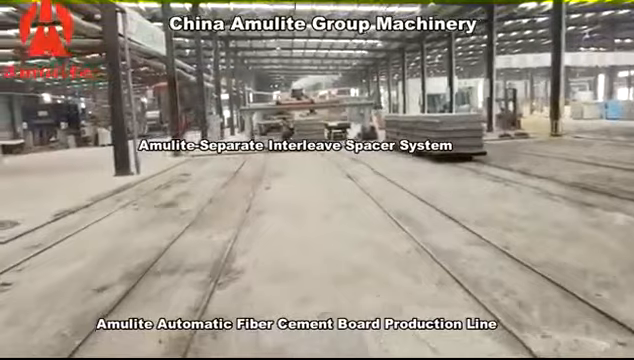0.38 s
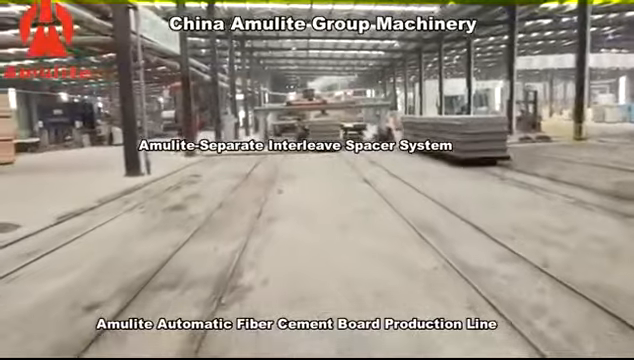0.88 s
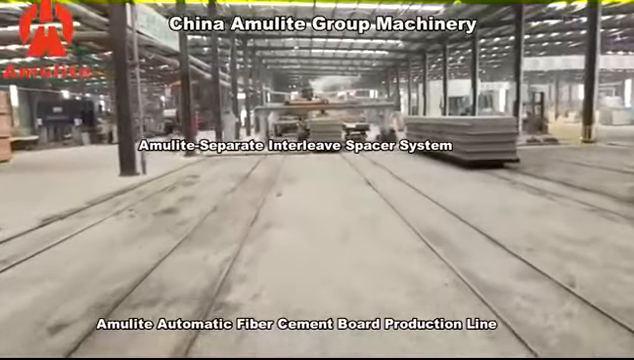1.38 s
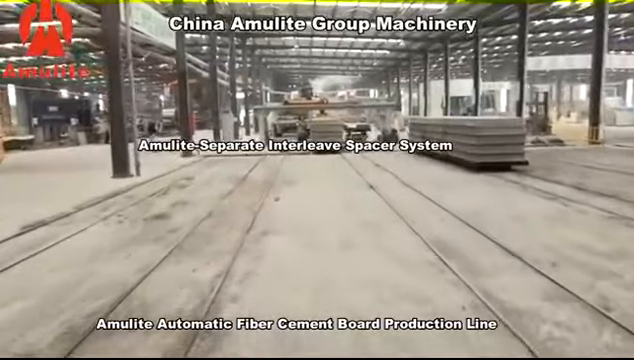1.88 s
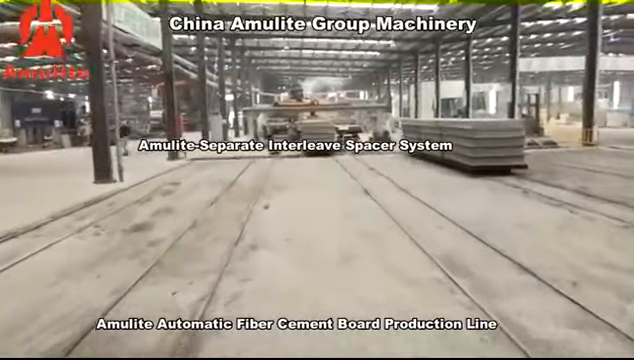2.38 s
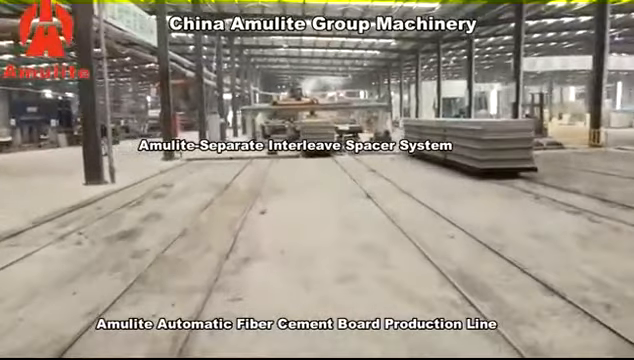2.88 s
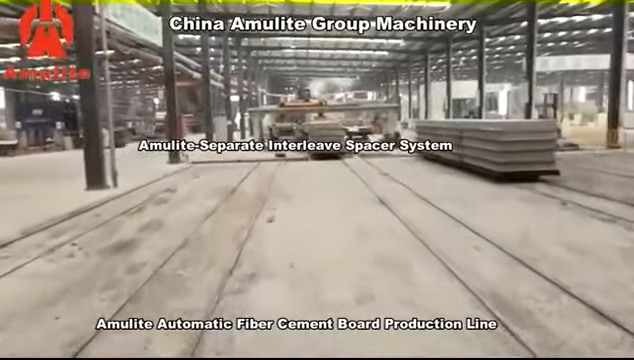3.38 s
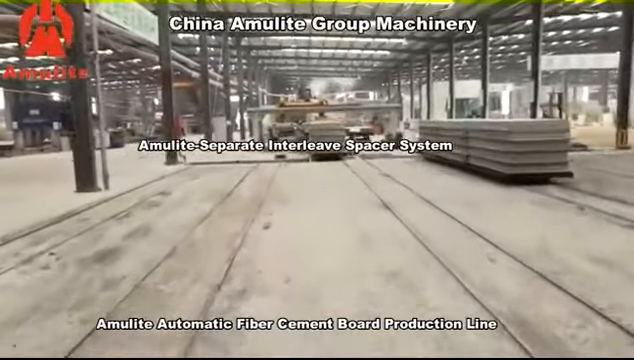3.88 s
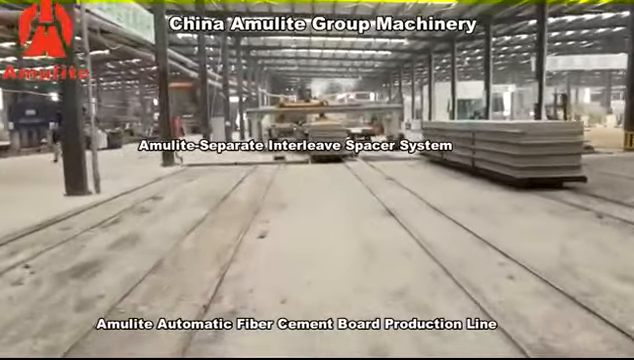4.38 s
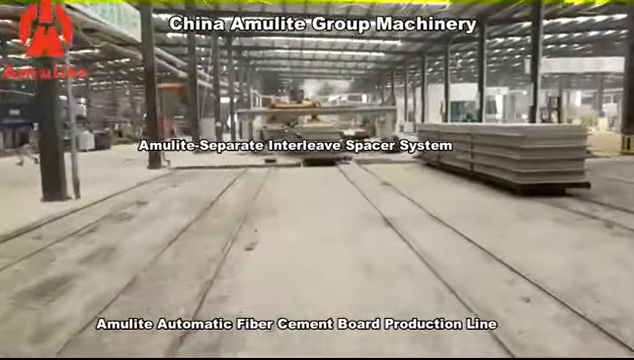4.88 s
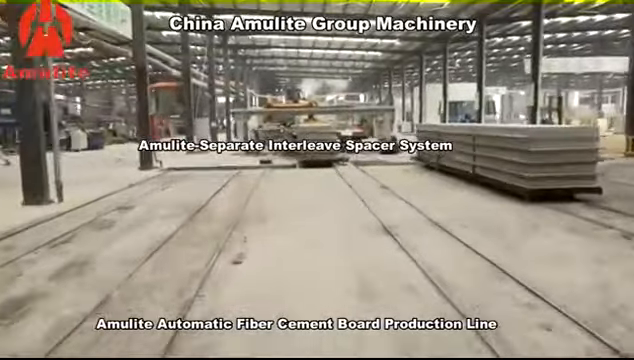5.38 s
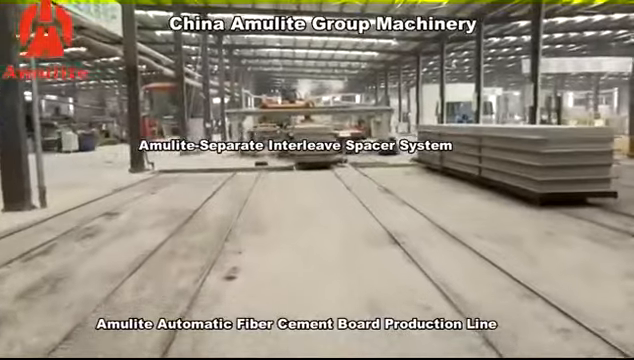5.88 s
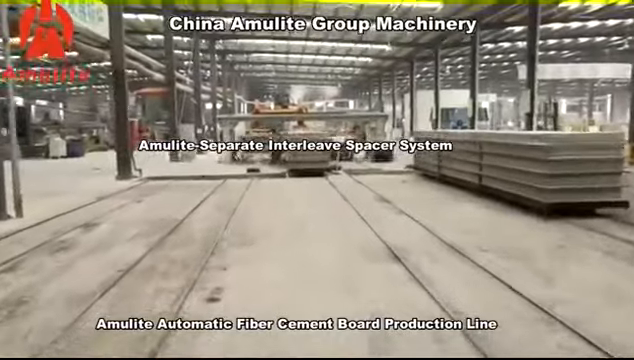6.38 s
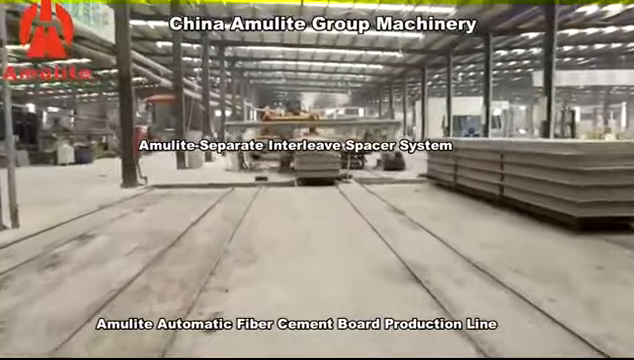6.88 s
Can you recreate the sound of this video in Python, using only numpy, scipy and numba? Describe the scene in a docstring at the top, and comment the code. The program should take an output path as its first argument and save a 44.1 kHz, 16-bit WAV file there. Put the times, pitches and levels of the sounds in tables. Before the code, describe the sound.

Low machinery rumble in a big factory hall, then a sudden loud blast of compressed air, followed by thin high squeals of brakes and rollers.

```python
"""Motors and fans rumble and hum throughout in a large factory hall: shaped noise and wavering tones.
Distant air lines hiss in swells of flickering noise; dry rollers and brakes squeal as fluttering tones.
A valve nearby snaps open and vents compressed air: bright turbulent noise through a ringing nozzle.
The hall is heard from the floor on a phone with one microphone: its gain control ducks everything under
the blast and lets it back slowly; weak treble drops out in patches."""
import sys
import numpy as np
from scipy import signal
from scipy.fft import rfft, irfft
from scipy.io import wavfile
from scipy.ndimage import uniform_filter1d
from numba import njit

SR = 44100
rng = np.random.default_rng(int(sys.argv[2]) if len(sys.argv) > 2 else 0)


def to_linear_factor(level_db):
    """Convert decibel levels (scalar or array-like) to linear amplitude factors."""
    exponent = np.asarray(level_db, float) / 20
    return 10 ** exponent


def wrap_up_sound(samples):
    """Save the sound to the file named by the first command line argument, as 16-bit audio."""
    columns = np.atleast_2d(samples).T
    # keep every value between -1 and 1, then stretch to whole-number steps
    tamed = np.clip(columns, -1, 1)
    steps = np.round(tamed * 32767).astype(np.int16)
    wavfile.write(sys.argv[1], SR, steps)


N = 309512
TIME = np.arange(N) / SR

# Spectrum of the low machine rumble: (frequency [Hz], relative level per Hz [dB])
RUMBLE_SPECTRUM = [(15, -66), (25, -21.5), (43, -27.5), (77, -7), (114, -0.5), (182, 0), (220, -5),
                   (323, -8), (450, -18.5), (700, -63)]
# Load on the machines: (time [s], rumble level before surges and throbs [dB])
MACHINE_LOAD = [(0, -34), (.9, -34), (1.5, -34), (1.9, -34.5), (2.2, -34.5), (2.7, -30.5), (3.42, -31.5),
                (3.9, -34.5), (4.15, -37.5), (4.4, -37.5), (4.65, -37.5), (4.9, -37), (5.6, -38),
                (5.95, -38), (6.25, -37), (6.47, -37.5), (6.7, -35.5), (7.02, -37.5)]
# Throbs of the deep rumble: (loudest moment [s], length [s], lift over the level between throbs [dB])
RUMBLE_THROBS = [(.2, .2, 4), (.56, .1, 3), (.9, .2, 4), (1.85, .25, 4), (2.88, .12, 4), (3.42, .25, 3),
                 (4.35, .4, 5), (5.4, .08, 4), (5.95, .3, 4), (6.46, .15, 6), (6.9, .15, 4)]
BETWEEN_THROBS_DB = -2
SURGE_DB, SURGES_PER_S = .7, 5.5  # random unevenness of the load
# Spectrum of far belts and chains: (frequency [Hz], relative level per Hz [dB])
CLATTER_SPECTRUM = [(250, -29), (380, -10.5), (480, -1), (694, 1.5), (855, -2.5), (1600, -11), (2400, -25)]
CLATTER_DB, CLATTER_FOLLOWS = -45, 0.92  # level at mean load; dB per dB of load
# Motor and gear hum: (pitch [Hz], width [Hz], level before load changes [dB])
HUM_TONES = [(132.1, 9, -50), (196, 26, -48), (328.2, 10, -53), (399, 7.2, -60), (491, 12, -56),
             (592, 8, -57), (704.5, 12, -55), (784, 11, -60.5), (1051, 8, -67)]

# Spectrum of distant air leaks: (frequency [Hz], relative level per Hz [dB])
LEAK_SPECTRUM = [(2500, -27), (3500, -8.5), (4900, -1.5), (5600, 2), (6800, -2), (7880, -7), (8100, -9),
                 (9790, -12.5), (11000, -14.5), (11500, -71)]
# Spectrum of the distant blower: (frequency [Hz], relative level per Hz [dB])
BLOWER_SPECTRUM = [(700, -36), (1200, -9), (1700, -4), (2370, -2.5), (2900, -2.5), (3500, -0.5),
                   (4300, -0.5), (6000, -13)]
# Air demand far off: (time [s], leak level [dB], blower level [dB])
FAR_AIR_FLOW = [(0, -44.5, -48.5), (.38, -40.5, -47.5), (.77, -43.5, -48.5), (1.3, -44, -49),
                (1.4, -40, -46), (1.68, -37.5, -45), (3.7, -39.5, -39.5), (3.9, -39, -42.5),
                (4.09, -41, -44), (4.48, -44, -46.5), (4.92, -40.5, -44), (5.42, -37.5, -42),
                (5.62, -40.5, -42), (5.81, -42.5, -43.5), (6.33, -42, -46.5), (6.58, -40.5, -44.5),
                (6.75, -41.5, -44), (7.02, -39.5, -44.5)]

# Thin wavering whines: (loudest moment [s], length [s], pitch [Hz], width [Hz], top level [dB])
WHINE_EVENTS = [(.05, .1, 10090, 90, -54), (.38, .24, 10050, 110, -53), (.6, .12, 8270, 70, -53),
                (.93, .15, 8270, 40, -48), (1.09, .14, 8262, 40, -48), (1.25, .2, 8255, 70, -55),
                (1.6, .25, 8265, 40, -48), (1.75, .12, 8258, 30, -42), (4.45, 1.1, 703, 25, -52.5),
                (4.35, .6, 790, 30, -53), (3.82, .15, 10080, 110, -60), (4.75, .4, 10080, 120, -60),
                (6.8, .4, 10600, 400, -58)]
WHINE_EDGE_DB = -4.5  # level at both ends of a whine, against its top
# Dry rollers chafing: (loudest moment [s], length [s], top pitch [Hz], width [Hz], top level [dB])
ROLLER_SQUEALS = [(.27, .12, 4310, 200, -43.5), (.36, .05, 5500, 500, -41), (.32, .3, 5120, 600, -44),
                  (.33, .3, 5580, 900, -42), (.62, .33, 5150, 600, -47), (.62, .35, 5600, 900, -44),
                  (1.07, .3, 5600, 900, -46), (5.45, .25, 5280, 120, -46), (6.09, .3, 5075, 110, -34),
                  (6.29, .2, 5050, 170, -40), (6.0, .2, 5040, 120, -38), (6.13, .2, 5185, 130, -39),
                  (6.625, .13, 4940, 130, -40), (6.66, .2, 5060, 90, -42), (6.7, .1, 5230, 120, -42),
                  (6.87, .2, 4980, 300, -46), (6.95, .1, 5380, 120, -39), (6.95, .12, 5190, 150, -40)]
SQUEAL_EDGE_DB, SQUEAL_SAG_HZ = -6.5, 45.54  # level against the top, and drop in pitch, at both ends
# Long brake squeals: (width [Hz], rows of (time [s], pitch [Hz], level [dB]))
BRAKE_SQUEALS = [ (70, [(5.34, 5200, -46), (5.4, 5190, -43), (5.55, 5170, -42), (5.63, 5160, -45)]),
                 (105, [(5.795, 4990, -43), (5.81, 4980, -34), (5.832, 4975, -33), (5.839, 4975, -38),
                 (5.85, 4965, -29), (5.872, 4955, -28), (5.883, 4950, -39), (5.9, 4950, -32),
                 (5.94, 4960, -32), (6.0, 4975, -36), (6.04, 4970, -34), (6.05, 4965, -41),
                 (6.12, 4965, -38), (6.155, 4965, -32), (6.19, 4960, -40), (6.22, 4965, -36.5),
                 (6.28, 4980, -44)]), (150, [(6.605, 5220, -41), (6.62, 5235, -37), (6.66, 5240, -40),
                 (6.68, 5250, -43), (6.695, 5300, -38), (6.712, 5355, -35), (6.735, 5350, -44),
                 (6.76, 5365, -30), (6.79, 5370, -35), (6.81, 5370, -31), (6.84, 5350, -32.5),
                 (6.865, 5320, -35), (6.875, 5290, -42), (6.885, 5270, -33), (6.9, 5250, -41),
                 (6.915, 5250, -35), (6.93, 5270, -36), (6.955, 5290, -30), (6.98, 5330, -33),
                 (6.992, 5260, -42), (7.02, 5260, -45)])]
HALL_T60_S, HALL_DB = .4, -7  # decay time; tail against direct sound

# Spectrum of the air jet: (frequency [Hz], relative level per Hz [dB])
JET_SPECTRUM = [(400, -17.5), (800, -26), (1400, -17.5), (1600, -12), (2030, -8.5), (2390, -12), (2730, -5),
                (3410, -4), (3730, -2), (5150, -2.5), (5680, -0.5), (6610, -3.5), (7800, -8.5),
                (8200, -12.5), (11000, -14.5), (11600, -53)]
# Resonances of the nozzle: (frequency [Hz], width [Hz], boost [dB])
NOZZLE_PEAKS = [(2170, 71, 1.5), (3810, 210, 1.5), (5450, 72, -0.5), (6670, 310, 1.5)]
# Spells of air through the valve: long blast, half-shut trickle, short puff:
# (starts [s], ends [s], jet level before pressure changes [dB],
# extra level at the start, negative where the jet builds up [dB], settling time constant [s])
VALVE_SPELLS = [(1.984, 3.401, -14, -9, 0.09), (3.414, 3.469, -19, -3.5, .1),
                (3.487, 3.547, -17, 13.5, 0.034)]
OPEN_S, SHUT_S = 0.021, 0.024  # time constants of the valve
# The tank pressure wavers and sags: (time [s], change of the jet level [dB])
TANK_PRESSURE = [(2.16, 1.5), (2.22, -1.5), (2.3, 0), (2.35, -2), (2.42, 0), (2.7, -1.5), (2.93, -3),
                 (2.98, -4), (3.2, -5.5), (3.28, -5), (3.4, -5.5)]
GUST_DB, GUSTS_PER_S = 0.5, 14
LINGER_DB, LINGER_S = -8, 0.061  # hiss that hangs in the hall
RING_HZ, RING_WIDTH_HZ, RING_DB, RING_S = 3800, 400, -3, .045  # the nozzle rings out as the valve first opens
RING_ON_DB, RING_ON_S = -11, 1.0  # and rings on faintly while the pressure is high
# Snap of the valve: (time [s], peak level [dB])
VALVE_SNAPS = [(2.0228, -3)]

# Edges of the treble bands in which left and right differ in brief blips: (frequency [Hz])
SPREAD_EDGES = [4600, 5700, 6800, 7500, 8300, 8900, 9700, 10400, 11000]
# Chance of a blip in each of those bands: (share of moments [0 to 1])
SPREAD_SHARES = [.012, .006, .015, .045, .02, .025, .02, .003]
SPREAD_DB = -3  # side level against its band


def walk(rate):
    """Random levels held 1 / rate s and slewed twice; spread near 1."""
    hold = int(SR / rate)
    steps = np.repeat(rng.standard_normal(N // hold + 1), hold)
    return 1.43 * uniform_filter1d(uniform_filter1d(steps, hold), hold)[:N]


def unit(x):
    """Scale to rms 1."""
    return x / np.sqrt(np.mean(x ** 2))


def curve(rows, column, fade_s=0.0075):
    """One column over time, and a gate that falls away outside the table."""
    rows = np.asarray(rows)
    outside = np.maximum(rows[0, 0] - TIME, TIME - rows[-1, 0]).clip(0)
    return np.interp(TIME, rows[:, 0], rows[:, column]), np.exp(-outside / fade_s)


def turbulence(spectrum, flicker_db, rate, peaks=()):
    """Coloured noise in third-octave bands that flicker, each partly with its neighbour."""
    hz = np.maximum(np.fft.rfftfreq(N, 1 / SR), 1)
    points = np.asarray(spectrum)
    db = np.interp(np.log(hz), np.log(points[:, 0]), points[:, 1])
    for peak_hz, width, boost_db in peaks:
        db = db + boost_db / (1 + (2 * (hz - peak_hz) / width) ** 2)
    noise = to_linear_factor(db) * rfft(rng.standard_normal(N))
    out, last = 0, walk(rate)
    for octave in np.arange(np.log2(points[0, 0]), np.log2(points[-1, 0]) + 1 / 3, 1 / 3):
        window = np.clip(1 - 3 * np.abs(np.log2(hz) - octave), 0, 1)
        band = irfft(noise * window, N)
        own = walk(rate)
        out = out + to_linear_factor(flicker_db * (own + last) / np.sqrt(2)) * band
        last = own
    return unit(out)


def tones(strands, rough):
    """Self-excited ringing: a steady core plus a band of stick-slip flutter around it."""
    out = 0
    for width, rows in strands:
        hz, gate = curve(rows, column=1)
        db, _ = curve(rows, column=2)
        grip = 1 + rough * (walk(width) + 1j * walk(width))
        ring = np.real(grip * np.exp(2j * np.pi * np.cumsum(hz) / SR))
        out = out + to_linear_factor(db) * gate * unit(ring)
    return out


def arches(events, edge_db, sag_hz):
    """Each event swells to its top and sinks again; pitch sags with the grip."""
    strands = []
    for s, length, hz, width, db in events:
        start = (s - length / 2, hz - sag_hz, db + edge_db)
        end = (s + length / 2, hz - sag_hz, db + edge_db)
        strands.append((width, [start, (s, hz, db), end]))
    return strands


def hall(x):
    """Direct sound plus a dense decaying tail from walls and roof."""
    t = np.arange(SR) / SR
    tail = rng.standard_normal(SR) * np.exp(-np.log(1000) * t / HALL_T60_S) * (t > .012)
    wet = signal.fftconvolve(x, tail / np.sqrt(np.sum(tail ** 2)))[:N]
    return (x + to_linear_factor(HALL_DB) * wet) / np.sqrt(1 + to_linear_factor(2 * HALL_DB))


def machines():
    """Low rumble, blurred clatter of far belts and chains, and a slightly wandering hum."""
    load_db = curve(MACHINE_LOAD, column=1)[0]
    rumble_db = load_db + SURGE_DB * walk(SURGES_PER_S)
    clatter_db = CLATTER_DB + CLATTER_FOLLOWS * (load_db - np.mean(load_db))
    hum = 0
    for hz, width, db in HUM_TONES:
        # the hall smears each tone into a narrow wavering band
        sway = walk(width) + 1j * walk(width)
        hum = hum + to_linear_factor(db) * unit(np.real((1.0 + sway) * np.exp(2j * np.pi * hz * TIME)))
    throb_db = BETWEEN_THROBS_DB
    for s, length, db in RUMBLE_THROBS:
        throb_db = throb_db + db * np.exp(-(2 * (TIME - s) / length) ** 2)
    rumble = to_linear_factor(rumble_db + throb_db) * turbulence(RUMBLE_SPECTRUM, flicker_db=.6, rate=10)
    clatter = to_linear_factor(clatter_db) * turbulence(CLATTER_SPECTRUM, flicker_db=1.0, rate=8)
    return rumble + clatter + to_linear_factor(rumble_db - np.mean(rumble_db)) * hum


def far_air():
    """Bright hiss of distant leaks and the duller rush of a blower, both swelling with the flow."""
    leak_db = curve(FAR_AIR_FLOW, column=1)[0]
    leaks = to_linear_factor(leak_db) * turbulence(LEAK_SPECTRUM, flicker_db=0.96, rate=13)
    blower_db = curve(FAR_AIR_FLOW, column=2)[0]
    blower = to_linear_factor(blower_db) * turbulence(BLOWER_SPECTRUM, flicker_db=0.7, rate=7.9)
    return leaks + blower


def whines():
    """Thin tones of constant centre pitch that waver, swell and sink."""
    return tones(arches(WHINE_EVENTS, WHINE_EDGE_DB, sag_hz=0), rough=.9)


def rollers():
    """Dry rollers stick and slip: rough squeals whose pitch and level arch with the grip."""
    return tones(arches(ROLLER_SQUEALS, SQUEAL_EDGE_DB, SQUEAL_SAG_HZ), rough=4)


def brakes():
    """Brakes held in stick-slip: long, purer squeals that glide in pitch and pulse in level."""
    return tones(BRAKE_SQUEALS, rough=.6)


def valve():
    """A jet of air through a ringing nozzle, with a snap as the valve opens."""
    pressure_db = curve(TANK_PRESSURE, column=1)[0]
    flow = 0
    for starts, ends, db, start_db, settle_s in VALVE_SPELLS:
        since = np.maximum(TIME - starts, 0)
        jet_db = db + start_db * np.exp(-since / settle_s) + pressure_db
        rise = 1 - np.exp(-since / OPEN_S)
        fall = np.exp(-np.maximum(TIME - ends, 0) / SHUT_S)
        flow = flow + to_linear_factor(jet_db) * rise * fall
    keep = np.exp(-1 / (LINGER_S * SR))
    linger = to_linear_factor(2 * LINGER_DB) * signal.lfilter([1 - keep], [1, -keep], flow ** 2)
    gusty = np.sqrt(flow ** 2 + linger) * to_linear_factor(GUST_DB * walk(GUSTS_PER_S))
    jet = gusty * turbulence(JET_SPECTRUM, flicker_db=1.0, rate=26, peaks=NOZZLE_PEAKS)
    since = np.maximum(TIME - VALVE_SPELLS[0][0], 0)
    ring_level = flow * (np.exp(-since / RING_S) + to_linear_factor(RING_ON_DB) * np.exp(-since / RING_ON_S))
    ring_rows = [(0, RING_HZ, RING_DB), (N / SR, RING_HZ, RING_DB)]
    out = jet + ring_level * tones([(RING_WIDTH_HZ, ring_rows)], rough=4)
    for s, db in VALVE_SNAPS:
        # a sub-millisecond burst at the nozzle's pitch
        burst = np.exp(-((TIME - s) / .0003) ** 2) * np.cos(2 * np.pi * 3800 * (TIME - s))
        out = out + to_linear_factor(db) * burst
    return out


def scene():
    """Everything reaches one microphone."""
    squeals = hall(brakes() + rollers())
    mono = machines() + far_air() + whines() + squeals + valve()
    return np.array([mono, mono])


@njit
def follow(level, attack, release, start):
    """Level estimate that rises fast and sinks slowly."""
    out, held = np.empty(len(level)), start
    for i in range(len(level)):
        held += (level[i] - held) * (attack if level[i] > held else release)
        out[i] = held
    return out


def gain_control(x):
    """Turns the whole sound down by 0.6 dB for each dB its held level lies over the threshold."""
    threshold_db, attack_s, release_s = -27.5, 0.0086, .9
    heard_db = 10 * np.log10(uniform_filter1d(x ** 2, 441) + 1e-12)  # 10 ms mean
    held_db = follow(heard_db, 1 / (attack_s * SR), 1 / (release_s * SR), threshold_db)
    return x * to_linear_factor(-.6 * np.maximum(held_db - threshold_db, 0))


def dropouts(x, under_db, hollow_db, treble_db, slope_db, grain):
    """Patches far weaker than their moment fall silent, sooner near 2.5 kHz and in the top treble;
    the rest turns grainy."""
    hz, _, z = signal.stft(x, SR, nperseg=2048, noverlap=1024)
    patch = np.abs(uniform_filter1d(np.abs(z) ** 2, size=5, axis=0)) + 1e-16
    moment = np.median(patch[(hz > 2500) & (hz < 8000)], axis=0)
    treble = np.clip((hz - 7600) / 500, 0, 1)
    hollow = np.exp(-((hz - 2500) / 700) ** 2)
    edge_db = under_db + hollow_db * hollow + treble * (treble_db + slope_db * (hz - 8000) / 1000)
    keep = (patch > to_linear_factor(2 * edge_db)[:, None] * moment) | (hz < 400)[:, None]
    # strong patches gain and weak ones lose against their neighbours
    log_patch = np.log(patch)
    stands_out = log_patch - uniform_filter1d(log_patch, size=31, axis=0)
    contrast = np.exp(grain * (hz > 900)[:, None] * stands_out)
    grainy = z * keep * np.minimum(contrast, 1.25)
    return signal.istft(grainy, SR, nperseg=2048, noverlap=1024)[1][:N]


def treble_spread(x):
    """Side signal: brief blips of delayed treble bands, so that left and right differ a little."""
    side = 0
    for low_hz, high_hz, share in zip(SPREAD_EDGES, SPREAD_EDGES[1:], SPREAD_SHARES):
        band_filter = signal.butter(8, [low_hz, high_hz], "band", fs=SR, output="sos")
        band = signal.sosfilt(band_filter, x)
        blips = np.repeat(1. * (rng.random(N // 1024 + 1) < share), 1024)[:N]
        side = side + to_linear_factor(SPREAD_DB) * uniform_filter1d(blips, size=1024) * np.roll(band, 300)
    return side


def band_limit(x):
    """A steep low-pass at the top of the band."""
    return signal.sosfilt(signal.butter(12, 11150, fs=SR, output="sos"), x)


def record(dry):
    """Gain control turns loud passages down; weak patches drop out; the treble flickers left to right."""
    level = gain_control(dry[0])
    patchy = dropouts(level, under_db=-17.5, hollow_db=9, treble_db=9.5, slope_db=-0.17, grain=0.55)
    side = treble_spread(patchy)
    mix = np.array([patchy + side, patchy - side])
    return band_limit(mix)


dry = scene()
out = record(dry)
wrap_up_sound(out)
```